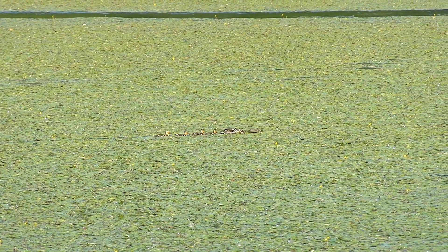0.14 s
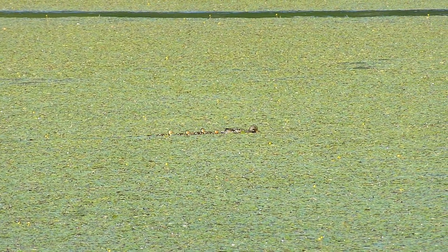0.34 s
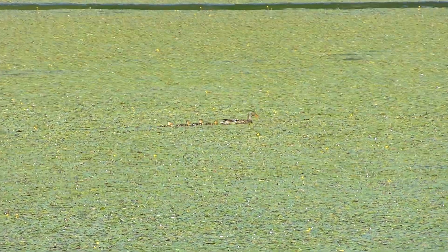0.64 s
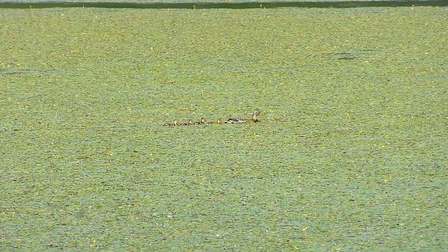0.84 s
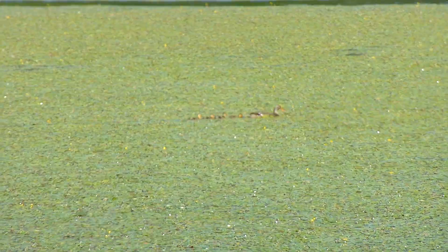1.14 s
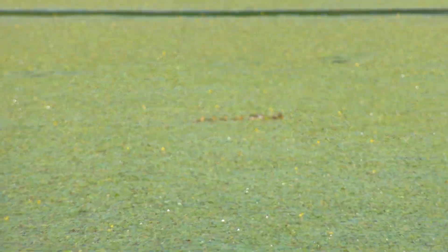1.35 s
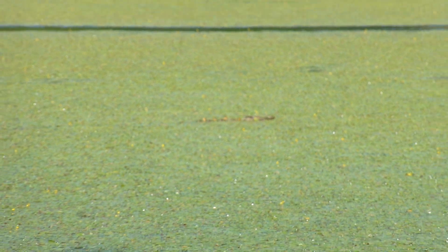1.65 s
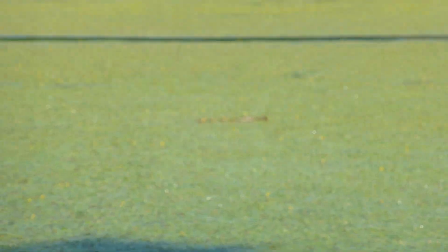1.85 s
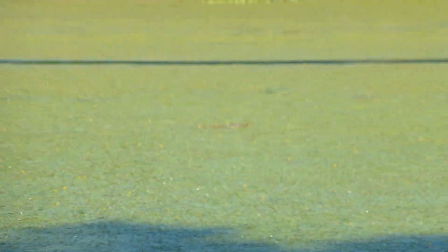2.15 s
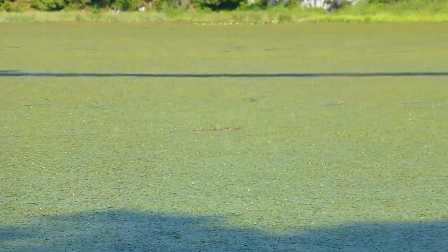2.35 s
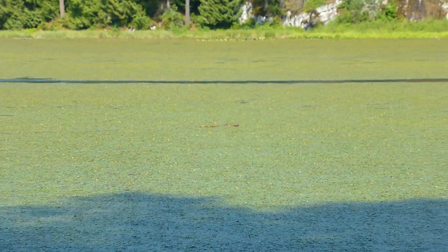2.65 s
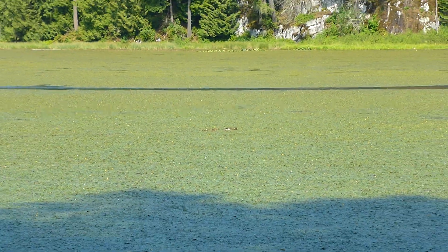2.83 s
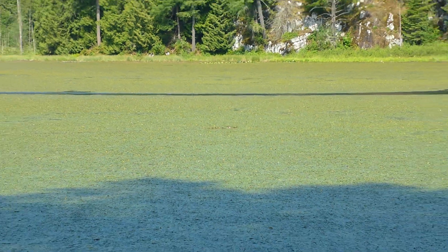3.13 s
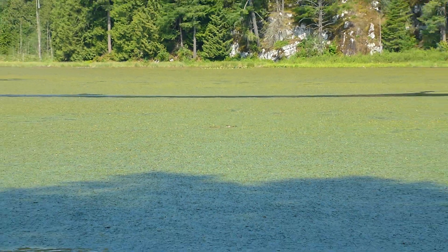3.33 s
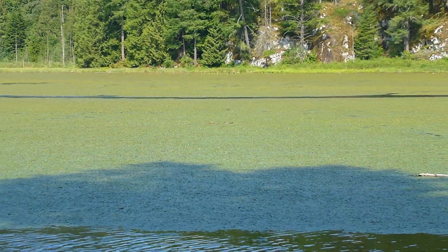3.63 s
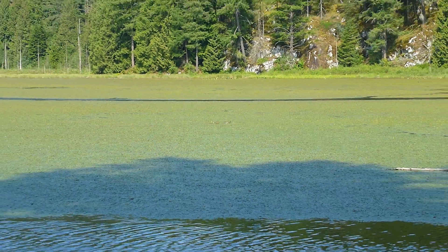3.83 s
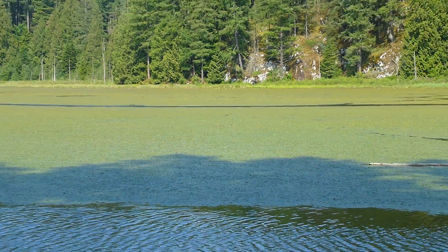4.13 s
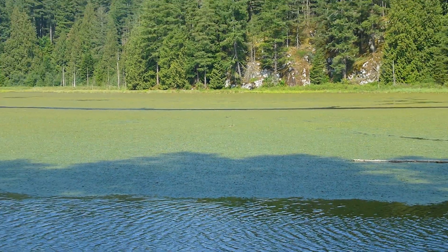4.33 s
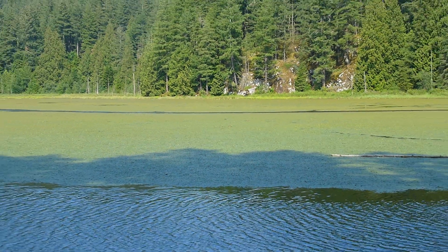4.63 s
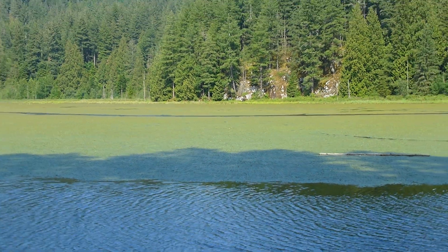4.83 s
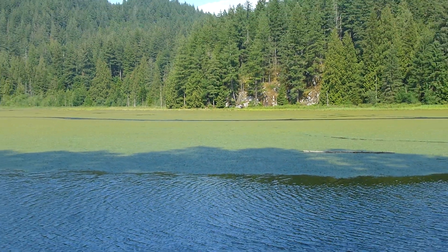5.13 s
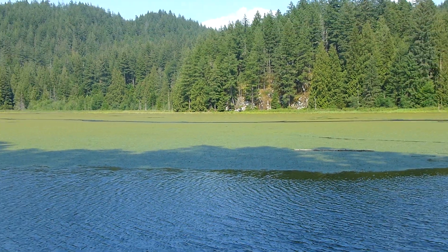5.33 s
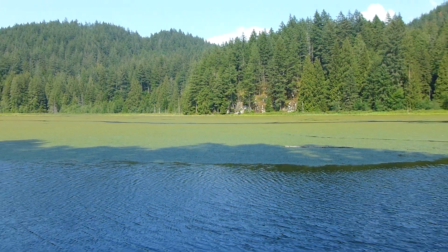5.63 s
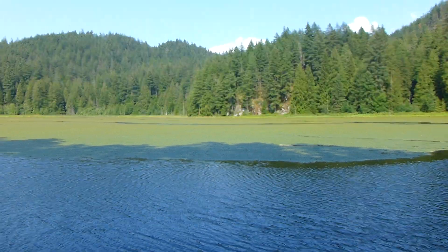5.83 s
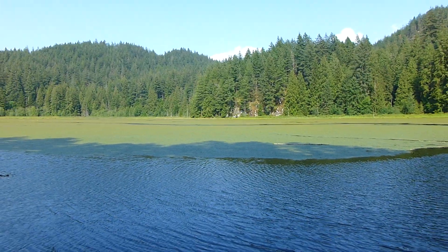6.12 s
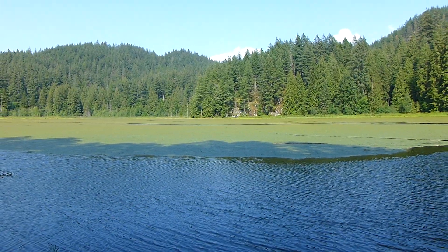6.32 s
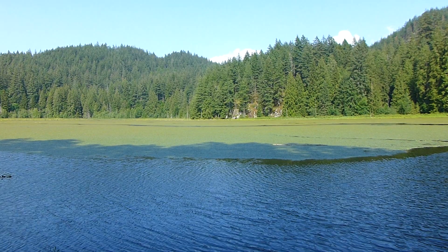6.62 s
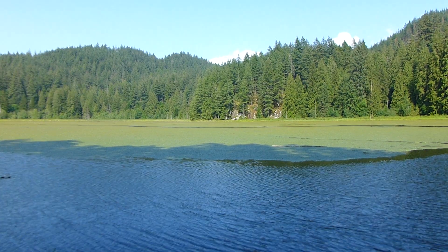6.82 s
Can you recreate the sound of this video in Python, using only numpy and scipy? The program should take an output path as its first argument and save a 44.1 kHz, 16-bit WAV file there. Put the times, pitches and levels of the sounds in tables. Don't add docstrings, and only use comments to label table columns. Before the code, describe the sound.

Quiet open air and leaves sit behind light skin rubbing and dull taps. A scratchy burst of plastic clicking leads into a steady, grainy miniature motor buzz, with hollow low body hum wavering beneath it and occasional crisp clicks. After nearly six seconds it stops short; a few clicks and soft thumps trail away. Microphones are inside the housing, intimate and slightly wide.

```python
import sys
import numpy as np
from scipy import signal
from scipy.fft import rfft, irfft, next_fast_len
from scipy.io import wavfile
from scipy.ndimage import uniform_filter1d

SR = 44100
rng = np.random.default_rng(int(sys.argv[2]) if len(sys.argv) > 2 else 0)


def invert_db(x):
    u = np.asarray(x, float) / 20
    return 10 ** u


def digitize_waveform(pressure):
    field = np.atleast_2d(pressure).T
    bounded = np.clip(field, -1, 1)
    quanta = np.round(bounded * 32767).astype(np.int16)
    wavfile.write(sys.argv[1], SR, quanta)


N = 307377
TIME = np.arange(N) / SR
MOTOR_ON_S, MOTOR_OFF_S = .743, 6.47


def unit(x):
    return x / np.sqrt(np.mean(x ** 2))


def noise():
    return rng.standard_normal(N)


def walk(rate_hz):
    k = int(SR / rate_hz)
    steps = np.repeat(rng.standard_normal(N // 64)[:N // k + 1], k)
    return unit(uniform_filter1d(uniform_filter1d(steps, k), k)[:N])


def curves(rows):
    s, *columns = np.transpose(rows)
    return [np.interp(TIME, s, column) for column in columns]


def gate(start_s, stop_s, rise_s, fall_s):
    return np.clip((TIME - start_s) / rise_s, 0, 1) * np.clip((stop_s - TIME) / fall_s, 0, 1)


def add(out, s, wave):
    i = int(s * SR)
    out[i:i + len(wave)] += wave[:N - i]


def butter(x, order, hz, kind="low"):
    return signal.lfilter(*signal.butter(order, hz, btype=kind, fs=SR), x)


def colour(x, points, size=4096):
    hz, db = np.transpose(points)
    bin_hz = np.arange(1, size // 2 + 2) * SR / size
    log_gain = np.log(invert_db(np.interp(np.log(bin_hz), np.log(hz), db)))
    cepstrum = irfft(log_gain)
    cepstrum[1:size // 2] *= 2
    cepstrum[size // 2 + 1:] = 0
    impulse = irfft(np.exp(rfft(cepstrum)))
    return unit(signal.oaconvolve(x, impulse)[:N])


def rings(x, rows):
    return sum(invert_db(db) * unit(signal.lfilter(*signal.iirpeak(hz, hz / width_hz, SR), x))
               for hz, width_hz, db in rows)


def sing(rows, width_hz):
    hz, db = curves(rows)
    slow = butter([noise(), noise()], 2, width_hz / 2)
    turn = 2 * np.pi * np.cumsum(hz) / SR
    return invert_db(db) * unit(slow[0] * np.cos(turn) + slow[1] * np.sin(turn))


def motor_running():
    return gate(MOTOR_ON_S, MOTOR_OFF_S, rise_s=0.0022, fall_s=0.0065)


def brushes():
    contact_hz = 187 * (1 + .022 * walk(40) + .004 * walk(3))
    phase = np.cumsum(contact_hz) / SR
    cycle = phase.astype(int)
    segment_db = np.array([1.8, -2.0, -.3])[cycle % 3]
    size_db = 1.2 * rng.standard_normal(N // 64)[cycle] + segment_db
    pressure = invert_db(size_db) * np.exp(-(1 - phase % 1) / .24)
    return unit(uniform_filter1d(pressure, size=25))


def gears(jolts):
    # frequency in Hz, density in dB per Hz.
    grit_spectrum = [(1760, -38), (3000, -15.5), (3420, -14), (3650, -6.5), (4030, -0.5), (4320, -6),
                     (4520, -3.5), (4680, -7.5), (4870, -3), (5270, -20), (5770, -15), (7370, -33.5),
                     (7700, -25), (10000, -38), (16900, -120)]
    hiss_spectrum = [(4000, -43.5), (5200, 4.5), (5650, -4), (6500, -8), (7300, -17.5), (9000, -38)]
    # frequency in Hz, width in Hz, level at first in dB, level once settled in dB.
    case_modes = [(3700, 100, -7, -21), (4030, 240, -13, -4.5), (4690, 180, -6, -16)]
    running = (TIME > MOTOR_ON_S) & (TIME < MOTOR_OFF_S)
    skin = invert_db(1.6 * walk(150))
    shake = np.where(running, unit(1.2 + jolts), unit(skin))
    rattle = colour(noise() * shake * invert_db(.5 * walk(40)), grit_spectrum, size=2048)
    settled = gate(MOTOR_ON_S, 9, 2.1, .1)
    case = 0
    for hz, width_hz, first_db, last_db in case_modes:
        mode_db = first_db + (last_db - first_db) * settled + 2.6 * walk(14)
        case = case + invert_db(mode_db) * rings(noise() * (1.0 + jolts), [(hz, width_hz, 0)])
    hiss = invert_db(-13.5) * colour(noise(), hiss_spectrum, size=512)
    return invert_db(-0.85) * rattle + running * (case + hiss)


def lens(jolts, grit, mids):
    # time in seconds, load in dB, barrel drag in dB.
    load_rows = [(0.78, -45, 6), (1.14, -41, -1), (1.18, -45.5, 4), (1.36, -42.5, 0.5), (2.11, -38.5, -1),
                 (2.31, -40, 1.5), (3.15, -38, -0.5), (3.6, -40, -0.5), (5.11, -36, 0), (5.18, -39.5, -1),
                 (6.06, -40, 2.5), (6.11, -41.5, 2), (6.44, -41, 3.5), (6.46, -43.5, 7.5)]
    # frequency in Hz, density in dB per Hz.
    low_spectrum = [(4290, -20.5), (7300, -4), (7470, -39), (8000, 3), (8680, 1), (9430, 8), (10400, -11),
                    (10600, -49), (13800, -8), (19000, -96)]
    high_spectrum = [(5880, -16), (10000, -4), (10400, 1), (11100, 6.5), (11800, -2.5), (12800, 2),
                     (13700, -8), (14900, -10), (15700, -24)]
    shell_spectrum = [(290, -40), (500, -5), (634, -8), (1000, -7), (1080, -4), (1220, -3), (1560, -9.5),
                      (2240, -9.5), (2520, -7.5), (3300, -12), (4290, -26), (7260, -120)]
    # frequency in Hz, width in Hz, level in dB.
    brush_modes = [(1970, 170, -86), (2217, 170, -57)]
    skin_bright = 0.45
    load_db, drag_db = curves(load_rows)
    extra_db = load_db + 35
    running = motor_running()
    slide = running * invert_db(drag_db + 0.91 * extra_db)

    fade_db = 10 - 2.5 * np.minimum(TIME - MOTOR_ON_S, 3.5)
    lever = gate(.58, MOTOR_ON_S, .01, .01)
    bright_db = running * fade_db + 2 * lever + 1.25 * walk(16)
    teeth = gears(jolts)
    teeth = teeth + (invert_db(bright_db) - 1) * butter(teeth, 2, [5300, 7300], "band")

    catch_db = 3.0 * walk(65)
    catch_db = catch_db - uniform_filter1d(catch_db, size=SR // 20)
    low_db = catch_db + 1.0 * walk(130) + 3.0 * walk(7)
    low = (invert_db(-47.5) * slide + invert_db(-21.5) * grit) * invert_db(low_db)
    low = low * colour(noise(), low_spectrum, size=1024)
    high_db = .6 * catch_db + 1.5 * walk(130) + 1.2 * walk(10)
    high = (invert_db(-47) * slide + invert_db(-24) * grit) * invert_db(high_db)
    high = high * colour(noise(), high_spectrum, size=512)

    panel = colour(noise() * (1 + 0.33 * running * jolts), shell_spectrum, size=1024)
    skin = skin_bright * panel + (1 - skin_bright) * butter(panel, 2, 1420)
    shell = running * invert_db(-51.5 + 0.27 * extra_db) * panel + mids * skin
    shell = shell * invert_db(0.71 * walk(30))
    shell = shell + running * invert_db(0.52 * extra_db) * rings(noise() * jolts, brush_modes)
    rattle = (running * invert_db(load_db - 0.33) + grit) * invert_db(0.11 * catch_db) * teeth
    return rattle + low + high + shell


def resonances():
    # time in seconds, frequency in Hz, level in dB.
    barrel_song = [(.86, 10500, -74), (.95, 10040, -41.5), (1.12, 10100, -44.5), (1.22, 9900, -52),
                   (1.36, 10300, -45), (1.6, 9800, -51.5), (2.1, 9060, -49.5), (3.3, 9820, -55),
                   (4.0, 9080, -61), (4.65, 9750, -47.5), (5.2, 9900, -95), (6.47, 9300, -77)]
    barrel_drone = [(4.3, 1180, -101), (4.7, 1220, -58), (5.3, 1290, -49), (5.6, 1324, -47),
                    (6.0, 1328, -42), (6.42, 1315, -42), (6.48, 1340, -90)]
    barrel_overtone = [(4.6, 1980, -80), (5.1, 2034, -57), (6.0, 2060, -59), (6.44, 2080, -55.5),
                       (6.48, 2080, -90)]
    spring_whistle = [(.585, 13500, -95), (.61, 13600, -63), (.74, 13600, -63), (.76, 13500, -95)]
    spring_low = [(.575, 9600, -80), (.595, 9500, -56), (.66, 9100, -59), (.72, 9000, -53),
                  (.745, 9200, -81)]
    # frequency in Hz, width in Hz, level in dB.
    idle_modes = [(4040, 130, -62), (2200, 160, -61)]
    song = invert_db(3 * walk(65)) * sing(barrel_song, width_hz=1300) * motor_running()
    barrel = song + sing(barrel_drone, width_hz=160) + sing(barrel_overtone, width_hz=300)
    spring = sing(spring_whistle, width_hz=900) + sing(spring_low, width_hz=1600)
    jerk_s, length_s = .727, .013
    jerk = invert_db(-40) * gate(jerk_s, jerk_s + length_s, length_s / 2, 0.0011)
    jerk = jerk * sing([(0, 9150, 0)], width_hz=1700)
    idle = rings(noise() * invert_db(2.5 * walk(20)), idle_modes) * gate(-1, .6, .1, .05)
    return barrel + spring + jerk + idle


def ticks():
    # time in seconds, peak in dB, pitch in Hz.
    latch_rows = [(.026, -29, 3800), (.048, -32, 4000), (0.179, -36, 3300), (0.286, -38, 4120),
                  (0.464, -43, 4110), (0.572, -37, 3850), (0.5915, -23, 4500), (.5918, -27, 2280),
                  (.5932, -26, 1400), (.572, -41, 7000), (6.4855, -25, 1300), (6.547, -30, 1500),
                  (6.5905, -31, 1200), (0.6135, -21.5, 5340), (.7635, -31, 2400), (1.289, -21.5, 3750),
                  (1.985, -19.5, 3700), (3.77, -24, 5400), (5.12, -22, 5000), (0.7155, -32, 5200),
                  (4.025, -24, 4700), (4.033, -26, 5400), (6.5205, -44, 7000), (6.5477, -36, 4500),
                  (6.567, -32, 4900), (6.582, -29, 4020), (6.594, -30, 4240), (6.95, -42, 4300),
                  (1.1472, -17.5, 4670), (1.148, -24, 3430), (3.477, -18, 4060), (4.03, -20, 5000),
                  (4.571, -21, 4430), (6.486, -22.5, 3930), (6.5338, -27, 4260), (6.5905, -15.5, 4250),
                  (6.608, -30, 4120), (6.6293, -35, 2400), (6.6673, -31, 4300), (6.767, -43, 4540),
                  (6.8674, -35, 4400), (6.918, -33, 4300)]
    catch_rows = [
        (6.0236, -23, 2900),
        (6.0236, -17, 3250),
        (6.0232, -19, 3650),
        (6.0232, -16, 4500),
        (6.0229, -31, 6300),
    ]
    rows = [*latch_rows, *catch_rows]
    out, t = np.zeros(N), np.arange(int(0.0024 * SR)) / SR
    for s, peak_db, hz in rows:
        tone = np.sin(2 * np.pi * hz * t) * np.exp(-t / 0.0011) * (1 - np.exp(-t / 0.00022))
        grit = butter(rng.standard_normal(len(t)), 3, [1800, 8500], "band")
        add(out, s, invert_db(peak_db - 0.5) * (tone + 0.37 * grit * np.exp(-t / 0.00049)))
    return out


def chatter():
    # time in seconds, peak in dB, pitch in Hz.
    stutters = [(0.5964, -29, 5100), (0.6, -30, 4750), (0.6044, -32, 4520), (0.608, -31, 4030),
                (0.6138, -29, 4230), (0.62, -26, 4370), (0.6195, -29, 4020), (0.6244, -31, 4220),
                (0.6324, -32, 4120), (0.634, -34, 4200), (0.647, -31, 4270), (0.6524, -37, 4690),
                (0.6574, -29, 4060), (0.6617, -29, 4560), (0.6704, -22, 4050), (0.6774, -31, 4070),
                (0.6823, -33, 4170), (0.6935, -38, 3960), (0.6962, -21.5, 4030), (0.703, -32, 4140),
                (0.707, -28, 4670), (0.715, -22, 4960), (0.718, -31, 3770), (0.7224, -27, 4160),
                (0.7294, -28, 4850), (0.7333, -21.5, 4370), (0.7364, -29, 4220), (0.7622, -29, 3870),
                (0.7704, -32, 3810)]
    out, t = np.zeros(N), np.arange(int(.008 * SR)) / SR
    envelope = np.exp(-t / 0.0014) * (1 - np.exp(-t / 0.00065))
    for s, peak_db, hz in stutters:
        wobble = uniform_filter1d(rng.standard_normal(len(t)), size=6)
        turn = 2 * np.pi * hz * t + 1.7 * wobble
        add(out, s, invert_db(peak_db + 8) * np.sin(turn) * envelope)
    band = signal.butter(N=3, Wn=[2300, 6800], btype="band", fs=SR, output="sos")
    return signal.sosfilt(band, out)


def rubbing():
    # start in seconds, length in seconds, grit in dB, shell mids in dB.
    rubs = [(.008, 0.053, -50, -44.5), (0.158, 0.032, -62, -44), (0.204, 0.052, -56, -45),
            (0.36, 0.031, -50, -44), (0.388, 0.081, -56.5, -49), (0.483, 0.046, -55, -47),
            (0.573, 0.051, -45, -64), (0.5904, 0.0077, -45, -20.5), (0.595, 0.017, -41, -52),
            (0.609, 0.012, -37, -32), (0.619, 0.025, -37, -74), (0.644, 0.032, -40, -39),
            (.672, 0.024, -41, -38), (0.69, 0.02, -41, -37), (0.711, 0.013, -40, -36),
            (0.724, 0.014, -37, -47), (0.757, 0.015, -52, -33), (6.47, 0.02, -68, -35),
            (6.488, 0.028, -63, -73), (6.517, 0.085, -46.5, -39.5), (6.617, 0.065, -59, -50),
            (6.773, .03, -79, -60), (6.797, 0.1, -64, -63), (6.898, 0.024, -64, -58),
            (6.944, 0.036, -57, -55)]
    shapes = np.array([gate(s, s + length_s, 0.32 * length_s, 0.0044) for s, length_s, _, _ in rubs])
    grit_db, mids_db = np.transpose(rubs)[2:]
    rest_grit = invert_db(-63 - 7.5 * gate(7.2, 9, .03, .1))
    rest_mids = invert_db(-51.5 - 5.5 * gate(6.6, 9, .12, .1))
    return rest_grit + invert_db(grit_db) @ shapes, rest_mids + invert_db(mids_db) @ shapes


def grip():
    # time in seconds, grip in dB.
    hold = [(0.0, -51.5), (0.37, -50), (1.3, -50), (1.88, -46.5), (2.14, -40.5), (2.25, -42), (2.85, -44),
            (3.4, -45), (3.71, -47.5), (4.68, -49.5), (4.99, -45), (5.57, -48.5), (5.98, -45), (6.56, -49),
            (6.72, -59), (6.97, -60)]
    # centre in seconds, length in seconds, level in dB.
    squeezes = [(0.376, 0.044, -43), (0.599, 0.0091, -26), (0.611, 0.018, -30), (0.749, .012, -32),
                (0.773, 0.027, -27.5), (1.132, 0.06, -33), (1.597, 0.044, -33.5), (1.817, 0.13, -33),
                (2.205, 0.043, -26), (2.308, 0.036, -26.5), (2.375, 0.028, -28), (2.451, 0.04, -23),
                (2.526, 0.16, -31), (2.66, 0.048, -27), (2.807, 0.02, -23.5), (2.867, .03, -26),
                (2.953, 0.036, -30), (3.06, 0.05, -32), (3.138, .03, -36.5), (3.242, 0.036, -30),
                (3.323, 0.077, -36.5), (3.402, 0.02, -25), (3.545, 0.14, -28.5), (3.63, 0.032, -43),
                (3.848, 0.32, -38.5), (4.38, 0.4, -37.5), (4.612, 0.073, -35), (4.884, 0.12, -38),
                (5.436, 0.062, -30.5), (6.173, 0.23, -40.5), (6.326, .1, -42.5), (6.445, 0.026, -33),
                (6.537, .015, -35), (6.575, .03, -36), (6.05, 0.039, -48), (6.466, 0.012, -23),
                (6.756, 0.014, -47), (6.8, 0.052, -46), (6.96, 0.017, -43)]
    # frequency in Hz, density in dB per Hz.
    rumble_spectrum = [(35, -80), (60, -51), (135, -18.5), (355, -6.5), (431, -5), (460, 0), (513, -36.5),
                       (572, -8), (734, -13.5), (800, -15.5), (1040, -55), (1760, -120)]
    body_hz, body_width_hz = 442, 76
    hum_from_s, hum_to_s = .81, 1.05
    grip_db, = curves(hold)
    running = motor_running()
    boom = invert_db(grip_db + 4.5 - 17 * (1.0 - running))
    for s, length_s, db in squeezes:
        boom = boom + invert_db(db) * np.exp(-np.square(2 * (TIME - s) / length_s))
    tremor_db = 1.7 * walk(45)
    body = signal.iirpeak(body_hz, body_hz / body_width_hz, SR)
    ring = signal.lfilter(*body, noise() * invert_db(tremor_db))
    ring = unit(signal.lfilter(*body, ring))

    rumble = colour(noise() * invert_db(0.6 * tremor_db + 1.1 * walk(14)), rumble_spectrum)
    palm_db = -12 * gate(5.42, 6.42, .15, .15)
    deep = signal.filtfilt(*signal.butter(N=2, Wn=140, fs=SR), rumble)
    rumble = rumble + (invert_db(palm_db) - 1) * deep

    pull = invert_db(-60) * (TIME < hum_from_s) + invert_db(-53) * gate(hum_from_s, hum_to_s, .03, 0.048)
    pull = pull + invert_db(-65) * running
    hum_turn = 2 * np.pi * np.cumsum(184 + 3.0 * walk(12)) / SR
    hum = pull * invert_db(2.8 * walk(25)) * np.sin(hum_turn)
    return invert_db(-8.5) * boom * ring + invert_db(grip_db + 3.5) * rumble + hum


def fingers():
    # time in seconds, pressure (negative pulls away),
    # contact in ms.
    taps = [(0.1977, 0.046, 0.43), (0.25, 0.021, .5), (0.517, 0.033, 4.3), (1.495, 0.03, 0.71),
            (1.6, 0.0079, 1), (1.781, 0.044, 0.17), (1.815, 0.079, 0.31), (2.061, 0.083, 0.66),
            (2.3311, 0.062, 0.75), (3.283, 0.066, 0.28), (3.6689, -0.033, 3.6), (4.092, 0.011, 0.2),
            (4.368, 0.079, 0.19), (4.401, 0.036, 0.25), (1.242, 0.02, 0.34), (1.097, 0.009, .15),
            (4.7476, 0.083, 0.78), (4.8919, 0.088, 0.44), (4.9606, 0.066, 0.32), (5.0414, 0.054, 0.58),
            (5.073, 0.078, 0.41), (5.2634, 0.14, 0.46), (5.381, 0.06, 0.66), (6.299, 0.055, 0.23)]
    # time in seconds, pressure
    # (negative pulls away), contact in ms, shell cut-off in Hz.
    knocks = [(0.137, 0.12, 1.07, 169), (0.492, 0.097, 0.7, 146), (0.768, 0.051, 0.86, 131),
              (1.031, 0.011, 2.8, 116), (1.591, -0.012, 0.98, 105), (2.4526, 0.09, 0.8, 322),
              (2.9857, 0.12, 0.47, 151), (3.4785, -0.36, 0.32, 155), (3.576, 0.085, 0.67, 164),
              (4.09, 0.053, 3.3, 307), (4.3273, -0.057, 4.4, 335), (5.288, 0.25, 0.78, 149)]
    thumb = [
        (6.4628, .1, .8, 380),
        (6.4641, -.35, 1.29, 281),
        (6.4714, -.28, 1.59, 246),
        (6.5458, -.49, 1.26, 226),
        (6.5583, -.31, 1.37, 204),
        (6.6403, .22, 1.3, 249),
        (6.7018, -.33, 1.25, 161),
    ]
    pats = [
        (0.276, .015, 1.2, 300),
        (6.4859, 0.11, 0.39, 256),
        (6.525, 0.023, 1.9, 300),
        (6.5647, 0.024, 2.2, 200),
        (6.592, 0.083, .8, 208),
        (6.617, .03, 2.2, 300),
        (6.755, 0.0087, 2.7, 300),
        (6.853, 0.0074, 2.3, 310),
        (6.902, 0.013, 1.9, 310),
        (6.9537, 0.021, 2, 318),
    ]
    # time in seconds, pressure left, pressure right, contact in ms, cut-off in Hz.
    creaks = [
        (0.2224, 0.02, 0.048, 0.85, 164),
        (.306, 0.0089, 0.035, 0.7, 190),
        (0.5902, -0.13, 0.15, 0.3, 452),
        (0.7633, -0.21, 0.21, 0.44, 600),
        (0.806, 0.041, 0.064, 3.5, 323),
        (1.049, 0.0063, -0.0023, 0.82, 190),
        (1.31, -0.0084, -.018, 0.44, 190),
        (4.354, 0.017, 0.013, 1.1, 188),
        (4.3683, -0.062, 0.12, 2.8, 565),
        (6.0243, 0.064, 0.017, 0.27, 1010),
    ]
    snaps = [
        (1.1475, .4, 0, .52, 720),
        (1.1476, 0, .16, .38, 820),
        (1.1486, .03, .07, .9, 300),
    ]
    left_share, finger, soft_thumb = .52, 1.6, 5
    pushes = [(s, left_share * p, p, ms, 200, finger) for s, p, ms in taps]
    pushes += [(s, left_share * p, p, ms, hz, finger) for s, p, ms, hz in knocks]
    pushes += [(*creak, finger) for creak in creaks]
    pushes += [(s, left_share * p, p, ms, hz, soft_thumb) for s, p, ms, hz in [*thumb, *pats]]
    pushes += [(*snap, soft_thumb) for snap in snaps]
    left, right = np.zeros(N), np.zeros(N)
    t_ms = np.arange(int(.03 * SR)) / SR * 1000
    for s, to_left, to_right, contact_ms, cut_hz, onset in pushes:
        push = (t_ms / contact_ms * np.exp(-t_ms / contact_ms)) ** onset
        order = 4 if onset == soft_thumb else 5
        stiff_shell = signal.butter(order, cut_hz, btype="high", fs=SR, output="sos")
        thud = signal.sosfilt(stiff_shell, push)
        thud = thud / np.abs(thud).max()
        lead_s = .00038 * (to_left * to_right > 0 and onset == soft_thumb)
        add(left, s - lead_s, to_left * thud)
        add(right, s, to_right * thud)
    both = np.array([left, right])
    return both - 0.099 * butter(both[::-1], 2, 550, "high")


def ports(x):
    # frequency in Hz, lead of the left in radians.
    lead_rows = [(0, 0), (460, .45), (570, 2.5), (1200, 3.1), (1500, 4), (1850, 5.4), (2070, 4.8),
                 (3450, 5.4), (6370, 5.7), (7580, 6.1), (9300, 5.9), (15300, 6.25)]
    # frequency in Hz, left minus right in dB.
    balance_rows = [(60, -1.5), (110, -3.0), (200, -4.0), (380, -7.0), (700, -1.5), (1290, 2.5),
                    (2380, 0.5), (4400, 0.0), (8120, 0.5), (15000, 1.0)]
    size = next_fast_len(N + 4096)
    hz = np.arange(1, size // 2 + 2) * SR / size
    balance_hz, balance_db = np.transpose(balance_rows)
    tilt = invert_db(np.interp(np.log(hz), np.log(balance_hz), balance_db) / 2)
    lag = np.exp(-1j * np.interp(hz, *np.transpose(lead_rows)))
    return irfft(rfft(x, size) * np.array([tilt, lag / tilt]), size)[:, :N]


def pond():
    # frequency in Hz, density in dB per Hz.
    air_spectrum = [(15, -80), (25, -34), (144, -13), (323, -9), (446, -5.5), (569, -37), (807, -8),
                    (899, -7), (1310, -1.5), (2860, -44), (4520, -24), (5920, -22), (9880, -27.5),
                    (15600, -39)]
    shared = ports(colour(noise() * invert_db(2.2 * walk(4)), air_spectrum))
    apart = np.array([colour(noise(), air_spectrum), colour(noise(), air_spectrum)])
    air_db = -53 - 12 * gate(6.47, 9, 0.041, .1)
    return invert_db(air_db) * (shared + 0.75 * apart)


def microphone_hiss():
    return invert_db(-74) * np.diff([noise(), noise()], prepend=0)


def scene():
    drive = (brushes(), *rubbing())
    stray = np.array([lens(*drive), lens(*drive)])
    stray = 0.3 * stray + 0.57 * butter(stray, 2, 1500)
    camera = lens(*drive) + resonances() + ticks() + chatter() + grip()
    return ports(camera) + stray + fingers() + pond() + microphone_hiss()


def roll_off(x):
    return signal.sosfilt(signal.butter(12, 15500, fs=SR, output="sos"), x)


def record(dry):
    top_cut = signal.ellip(N=8, rp=.2, rs=70, Wn=15650, fs=SR, output="sos")
    return roll_off(signal.sosfilt(top_cut, dry))


dry = scene()
out = record(dry)
digitize_waveform(out)
```